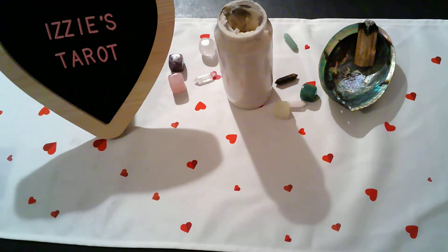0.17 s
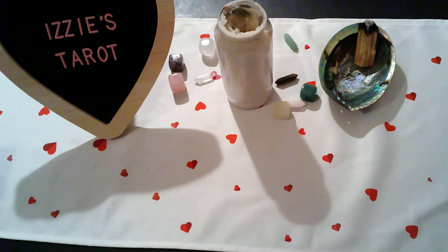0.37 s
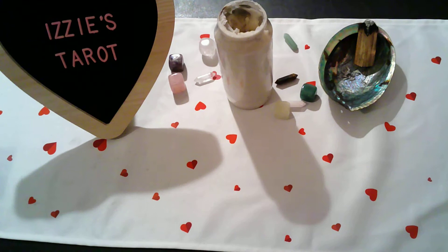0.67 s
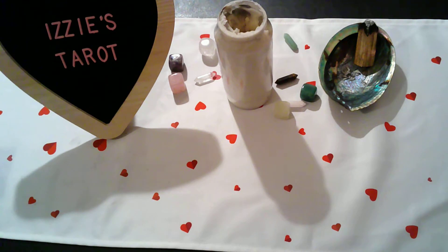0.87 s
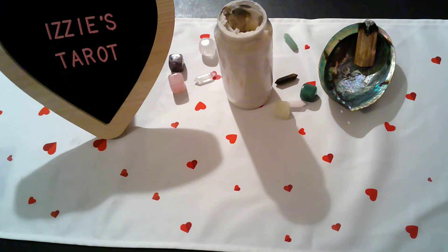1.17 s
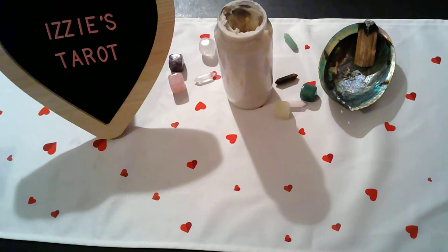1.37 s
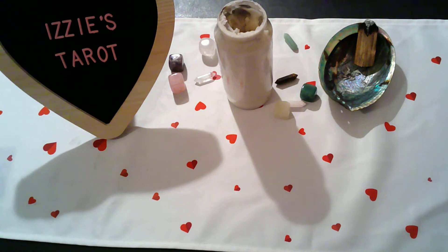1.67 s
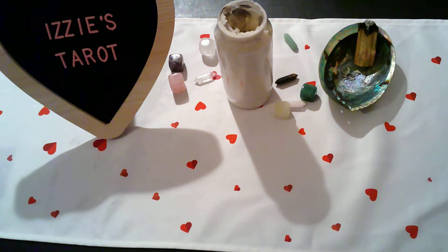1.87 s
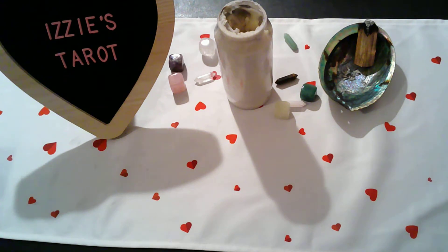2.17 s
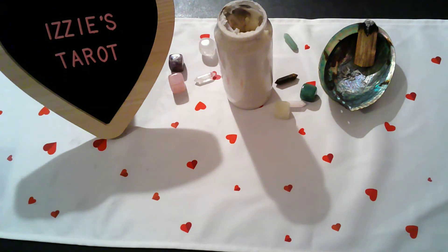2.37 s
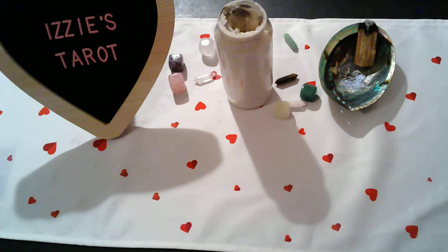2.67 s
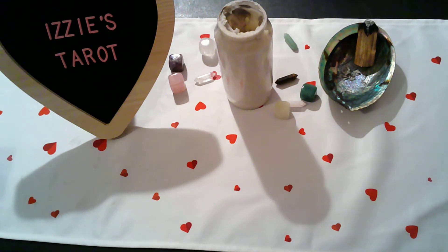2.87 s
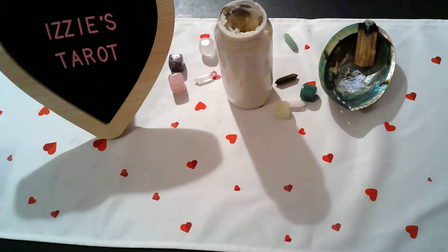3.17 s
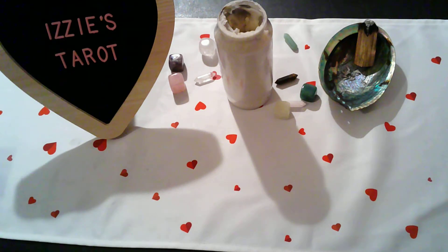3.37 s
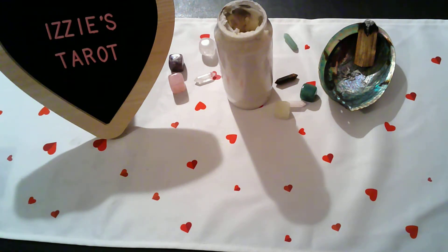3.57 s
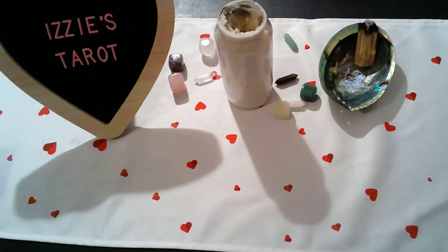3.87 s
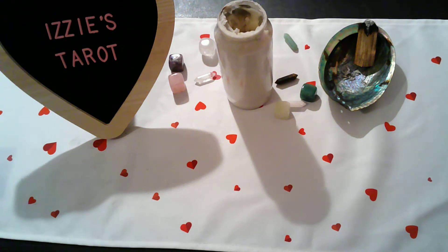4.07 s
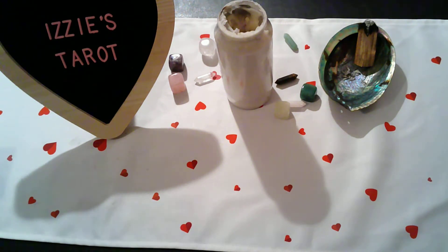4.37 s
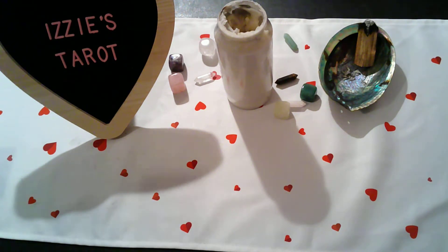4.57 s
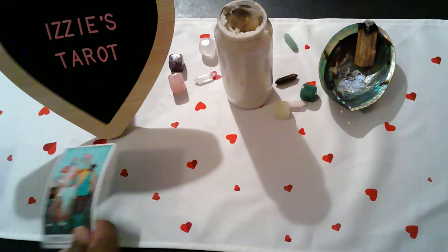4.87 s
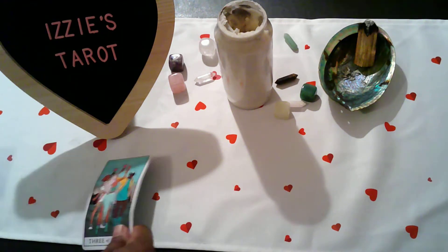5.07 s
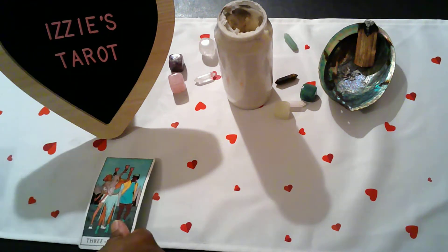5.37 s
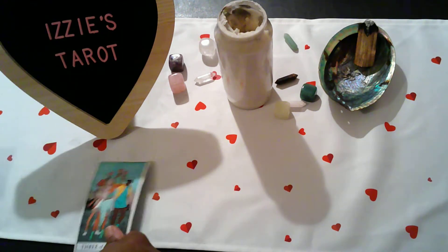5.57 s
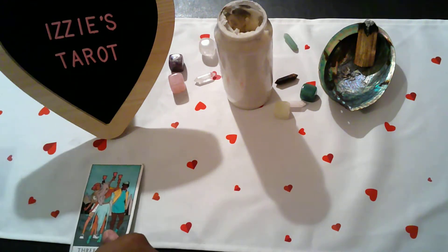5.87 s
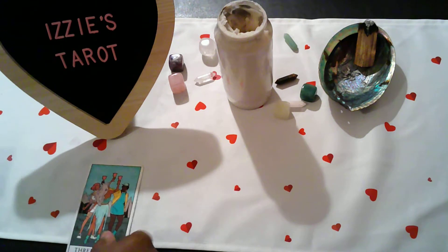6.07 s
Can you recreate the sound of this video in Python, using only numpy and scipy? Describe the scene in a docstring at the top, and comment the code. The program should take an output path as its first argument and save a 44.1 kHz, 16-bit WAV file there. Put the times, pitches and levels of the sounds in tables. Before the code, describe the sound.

Close handling of stiff cards: faint papery slides, a sharp burst of snaps with a table tap, more scuffs, then a last tap.

```python
"""Stiff cards are handled over a cloth-covered table in a small, quiet room with low rumble,
a faint breathy band and hiss. A faint snap of a card edge comes first, then rasping slides of tiny slips.
At about 2 s a burst of hard snaps, made of short resonances, joins the first tap on the padded table.
Later come short scuffs, faint shifts of grip, a tiny squeak and second tap near 4 s, more snaps and slides.
A last tap falls just after 6 s. A close microphone with a bright peak picks it all up."""
import sys
import numpy as np
from scipy import signal
from scipy.fft import rfft, irfft
from scipy.io import wavfile

SR = 44100
rng = np.random.default_rng(int(sys.argv[2]) if len(sys.argv) > 2 else 0)


def wav_record(signal):
    """Record a signal, one row per channel, as 16-bit PCM in the file named by sys.argv[1]."""
    frames = np.transpose(np.atleast_2d(signal))
    bounded = np.clip(frames, -1, 1)
    # unit amplitude maps onto the largest positive 16-bit level
    quanta = np.round(bounded * 32767).astype(np.int16)
    wavfile.write(sys.argv[1], SR, quanta)


N = 274125
T = np.arange(N) / SR

# low room rumble with a faint breathy band near 1.8 kHz, the shape of the spectrum:
# pitch_hz, density_db (relative, per Hz)
BACKGROUND_SPECTRUM = [(12, -33), (20, -3), (118, 1.5), (266, -7.5), (351, -10), (735, -18), (864, -18.5),
                       (1440, -23), (1770, -21), (1940, -24), (2440, -27.5), (3220, -32.5), (5000, -44.5),
                       (6500, -73.5), (11000, -120)]
# a card edge snaps free, or scuffs briefly where the chatter is long: start_s, energy_db (relative),
# edge_db (sharp edge against flex), chatter_ms (time to fade to about a third), pitch_hz (bent part),
# tone_db (bent part against flex)
CARD_SNAPS = [(.0655, -31.5, -8, 2.5, 800, 7), (1.8205, -18.5, -15, 8, 1200, 7),
              (1.8345, -16.5, -27, 3.3, 1700, -6), (1.8461, -21, -2, 3, 820, 1),
              (2.027, -29, -3, 3.3, 1800, -3), (2.0398, -16, -9, 4.4, 1400, 0),
              (2.045, -15.5, -7, 6.3, 506, 1), (2.0615, -1.5, -10, 1.6, 1080, 3),
              (2.063, 0, -16, 2.0, 480, -2), (2.0633, -7, -14, 1.4, 8000, 8),
              (2.0647, -5, -14, 1.3, 2100, 3), (2.078, -18.5, 6, 2.5, 1410, 2),
              (2.29, -29, -11, 20, 890, 0), (2.589, -24, -11, 16, 950, -5), (4.013, -25, 3, 6, 4900, -1),
              (4.0175, -18.5, 0, 6, 4800, -3), (4.171, -26, -21, 12, 2200, 3),
              (4.571, -29, -7, 17, 1340, 10), (5.0337, -29.5, -21, 2.6, 1700, 2),
              (5.102, -29.5, -24, 2, 1350, 22), (5.6893, -9.5, 7, 3.3, 6000, 5),
              (5.6918, -9, 6, 3.7, 3100, 3), (5.699, -11.5, 10, 3.8, 850, -3),
              (5.7338, -23, 12, 2, 6400, 15), (6.0614, -18.5, 4, 7.8, 2300, -2)]
# the flexing card's resonances: pitch_hz, width_hz, level_db
CARD_RESONANCES = [(514, 200, 7), (800, 300, 8.5), (1130, 280, 5.5), (1610, 200, 3), (2070, 220, -4.5),
                   (2250, 210, -12), (2550, 130, -13.5), (3420, 340, -20), (4208.6, 620, -21),
                   (5490, 600, -16)]
# a card slides: fastest_s, length_s, level_db (before the stroke is trimmed and shaped),
# hiss_db (against rasp, before the hiss is trimmed)
CARD_SLIDES = [(0.399, 0.2, -66.5, 8), (.57, 0.055, -63.5, 3.5), (0.863, .21, -61.5, 4),
               (1.142, 0.24, -67.5, -0.5), (1.579, .28, -70.5, 8), (1.774, 0.063, -59, 1),
               (1.85, .17, -58, 4.5), (2.299, 0.072, -57, 0), (2.369, .18, -66, 6), (2.62, .22, -65, 4),
               (2.79, .26, -66, 2), (3.03, 0.23, -63, 5), (3.259, 0.084, -64.5, 3.5),
               (4.004, 0.076, -55, 4), (4.19, .06, -49.5, -2), (4.168, 0.25, -61.5, 7),
               (4.577, 0.14, -62, 4.5), (5.049, .17, -64, 0), (5.182, 0.21, -66, 3.5),
               (5.318, .13, -61, -1), (5.495, .09, -65, 1), (5.57, 0.16, -61, -2.5), (6.06, 0.037, -52, -1)]
# blows on the table: start_s, energy_db (before the low cut), ring_share (of the free ring), contact_ms
TABLE_TAPS = [(2.0626, -10.5, .35, 1.4), (4.018, -13.5, 0.082, 0.78), (6.0647, -4.5, 0.73, 0.45)]
# the table top under its cloth, ringing freely: pitch_hz, level_db, t60_s (time to fall by 60 dB)
TABLE_RESONANCES = [(222, -15.5, 0.17), (267, 0, 0.087), (296, -5, 0.15), (383, -5.5, 0.12),
                    (482, 2.5, 0.03), (585, -6, 0.014), (750, -13, 0.031), (1110, -10, 0.039),
                    (1786, 2.5, 0.025)]
# the fingers keep shifting on the deck: start_s, end_s
GRIP_SHIFTS = [(3.33, 3.9), (4.22, 4.73), (5.76, 6.2)]
# early reflections from nearby surfaces: delay_s, level_db
NEAR_ECHOES = [(.0031, -15.5), (.0098, -12), (0.0144, -14.5)]
# microphone colour: pitch_hz, gain_db
MIC_COLOUR = [(60, -5.5), (200, 1.5), (4800, 2.5), (6000, 4.5), (6500, 9), (6850, 13), (7300, 9.5),
              (7700, 2.5), (8400, -6), (9000, -18.5)]

# air pushed by a snap of 0 dB, against its flex; a harder snap pushes more
THUMP_DB, THUMP_DB_PER_DB = -5.5, 0.2
RISE_SHARE = 0.55  # part of a stroke spent speeding up
# a card pressed harder is louder and rasps lower
RASP_HZ, RASP_AT_DB, RASP_OCTAVES_PER_DB = 2690, -66, -0.04
STROKE_TRIM_DB = -4.5  # applied to each whole stroke, and to its hiss against its rasp
FIDGET_GAP_S, FIDGET_LENGTH_S = 0.17, 0.14
FIDGET_DB, FIDGET_SCATTER_DB, FIDGET_HISS_DB = -70, 0.5, 6.5  # before the stroke trims
MIC_TOP_HZ = 8900


def amp(db):
    """Turn decibels into a gain."""
    return 10 ** (np.asarray(db) / 20)


def unit(x):
    """Scale a sound to an energy of one."""
    return x / np.sqrt(np.sum(x ** 2))


def level(x, db):
    """Scale a sound to an average (rms) level."""
    return x * amp(db) / np.sqrt(np.mean(x ** 2))


def add(out, start_s, x):
    """Mix x into out from start_s on."""
    i = int(start_s * SR)
    out[i:i + len(x)] += x[:max(N - i, 0)]


def band(x, hz, width_hz):
    """Pass x through one resonance, with a gain of 1 at its centre."""
    return signal.lfilter(*signal.iirpeak(hz, hz / width_hz, fs=SR), x)


def colour(x, points, size=2048):
    """Filter x along a curve of (Hz, dB) points, with no sound ahead of its cause."""
    hz, db = np.transpose(points)
    bins_hz = np.fft.rfftfreq(size, 1 / SR)
    gain = amp(np.interp(np.log(bins_hz + 1), np.log(hz), db))
    # folding the cepstrum (spectrum of the log gain) makes the filter act as early as it can
    cepstrum = irfft(np.log(gain))[:size // 2]
    folded = np.r_[cepstrum[0], 2 * cepstrum[1:]]
    response = irfft(np.exp(rfft(folded, size)))
    return signal.fftconvolve(x, response)[:len(x)]


def crackle(count, spread_db):
    """Dense tiny slips of paper fibres, a few much larger than the rest."""
    boost = np.minimum(rng.exponential(size=count), 2 * np.pi)
    return rng.standard_normal(count) * amp(spread_db * boost)


def walk(count, rate):
    """Random wander: straight lines between random heights, rate of them each second."""
    t = np.arange(count) / SR * rate
    points = int(t[-1]) + 2
    return np.interp(t, np.arange(points), rng.standard_normal(points))


def floor(background_db=-57, hiss_db=-77):
    """Low room rumble with a faint breathy band near 1.8 kHz, wavering a little together, under an even hiss."""
    background = colour(rng.standard_normal(N), BACKGROUND_SPECTRUM) * amp(0.2 * walk(N, rate=3.8))
    return level(background, background_db) + level(rng.standard_normal(N), hiss_db)


def snaps(click_db=-5, flex_top_hz=4600, thump_hz=300, edge_hz=6500, tone_share=0.36, size=4096):
    """A card edge snaps free, or scuffs if the chatter is long; the card flexes, thumps the air, its edge ticks."""
    out, t = np.zeros(N), T[:size]
    soft = signal.butter(4, flex_top_hz, fs=SR, output="sos")
    for start_s, db, edge_db, chatter_ms, hz, tone_db in CARD_SNAPS:
        push = unit(crackle(size, spread_db=2.5) * np.exp(-t * 1000 / chatter_ms))
        push[0] += amp(click_db)

        flex = sum(amp(mode_db) * band(push, mode_hz, width_hz)
                   for mode_hz, width_hz, mode_db in CARD_RESONANCES)
        flex = signal.sosfilt(soft, flex)
        # a shorter bend rings higher
        tone = band(band(push, hz, hz * tone_share), hz, hz)
        thump = band(band(push, thump_hz, width_hz=210), thump_hz, width_hz=205)
        edge = band(band(push, edge_hz, width_hz=3800), edge_hz, width_hz=5200)

        thump_db = THUMP_DB + THUMP_DB_PER_DB * db
        parts = unit(flex) + amp(tone_db) * unit(tone)
        parts += amp(thump_db) * unit(thump) + amp(edge_db) * unit(edge)
        add(out, start_s, amp(db) * unit(parts))
    return out


def stroke(length_s, db, hiss_db, hiss_hz=6500, rasp_share=0.97, brush_db=-4):
    """A stroke speeds up and dies away; surfaces catch unevenly, rasping in the card and hissing at its edge."""
    count = int(length_s * SR)
    speed = np.interp(np.linspace(0, 1, count), [0, RISE_SHARE, 1], [0, 1, 0])
    rasp_hz = RASP_HZ * 2 ** (RASP_OCTAVES_PER_DB * (db - RASP_AT_DB))
    slips = crackle(count, spread_db=2.5) * amp(2.6 * walk(count, rate=180))

    rasp = band(band(slips, rasp_hz, rasp_hz * rasp_share), rasp_hz, 2 * rasp_hz)
    hiss = band(slips, hiss_hz, width_hz=3000)
    brush = band(slips, hz=700, width_hz=710)  # the fingers and cloth are duller
    mix = level(rasp, 0) + level(hiss, hiss_db + STROKE_TRIM_DB) + level(brush, brush_db)
    return level(mix, db + STROKE_TRIM_DB) * speed ** 1.09


def slides():
    """Cards are pushed off the deck and drawn over each other, one stroke of slips each."""
    out = np.zeros(N)
    for fastest_s, length_s, db, hiss_db in CARD_SLIDES:
        add(out, fastest_s - RISE_SHARE * length_s, stroke(length_s, db, hiss_db))
    return out


def taps(lowest_hz=170, size=16384):
    """The cloth softens each blow; the table top rings briefly, less while the hand rests on it."""
    out, t = np.zeros(N), T[:size]
    for start_s, db, ring_share, contact_ms in TABLE_TAPS:
        ringing = np.zeros(size)
        for hz, mode_db, t60_s in TABLE_RESONANCES:
            fade = np.exp(-np.log(1000) * t / (t60_s * ring_share))
            ringing += amp(mode_db) * fade * np.sin(2 * np.pi * hz * t)
        # the force of the blow rises and falls as half a sine wave
        push = np.sin(np.pi * np.minimum(t * 1000 / contact_ms, 1))
        add(out, start_s, amp(db) * unit(signal.fftconvolve(ringing, push)[:size]))
    # an open board radiates little below its first mode
    return signal.sosfilt(signal.butter(2, lowest_hz, "high", fs=SR, output="sos"), out)


def fidgets():
    """Faint, light strokes at uneven moments while the fingers shift their grip."""
    out = np.zeros(N)
    for start_s, end_s in GRIP_SHIFTS:
        for s in np.arange(start_s, end_s - FIDGET_LENGTH_S / 2, FIDGET_GAP_S):
            late_s = rng.uniform(-0.5, 0.5) * FIDGET_GAP_S / 2
            db = rng.normal(FIDGET_DB, FIDGET_SCATTER_DB)
            add(out, s + late_s, stroke(FIDGET_LENGTH_S, db, FIDGET_HISS_DB))
    return out


def squeak(start_s=3.966, end_s=4.014, db=-63.5, hz=3300, width_hz=420):
    """One glossy face sticks and slips on the next: narrow noise, nearly in tune."""
    out, count = np.zeros(N), int((end_s - start_s) * SR)
    tone = band(band(rng.standard_normal(count), hz, width_hz), hz, 2 * width_hz)
    add(out, start_s, level(tone * np.sqrt(np.hanning(count)), db))
    return out


def near(x):
    """The direct sound and a few delayed copies reflected from surfaces close by."""
    out = x.copy()
    for delay_s, db in NEAR_ECHOES:
        add(out, delay_s, amp(db) * x)
    return out


def room(x, t60_low_s=0.3, t60_high_s=0.32, build_s=0.0048, size=22050):
    """The short diffuse tail of a furnished room, made of fading noise."""
    t, noise = T[:size], rng.standard_normal(size)
    low = signal.sosfilt(signal.butter(2, 3000, fs=SR, output="sos"), noise)
    high = noise - low
    tail = low * np.exp(-np.log(1000) * t / t60_low_s) + high * np.exp(-np.log(1000) * t / t60_high_s)
    tail = colour(tail, [(200, -1.5), (500, 1.0), (1100, -1.0), (1900, -1.5), (4000, -2.5), (7000, -2.0)])
    build = np.minimum(t / build_s, 1)
    return signal.fftconvolve(x, unit(tail * build))[:N]


def scene(snap_db=-4.0, wet_db=-10.0, count=4):
    """Cards and table in the room: near sound, diffuse tail and background."""
    background = floor()
    direct = amp(snap_db) * snaps()
    # a flexing card throws a different chatter in each direction, so its tail is dense and smooth
    scattered = sum(room(snaps()) for _ in range(count)) / np.sqrt(count)
    handling = slides() + taps() + fidgets() + squeak()
    diffuse = amp(snap_db) * scattered + room(handling)
    return (near(direct + handling) + amp(wet_db) * diffuse + background)[None]


def record(dry):
    """The microphone is brightest near 7 kHz, and the top is cut steeply above that."""
    cut = signal.ellip(10, 0.2, 80, MIC_TOP_HZ, fs=SR, output="sos")
    return signal.sosfilt(cut, colour(dry[0], MIC_COLOUR))[None]


dry = scene()
out = record(dry)
wav_record(out)
```